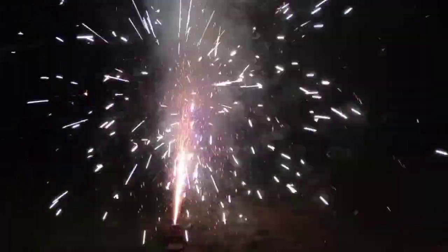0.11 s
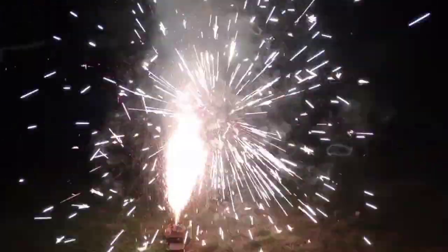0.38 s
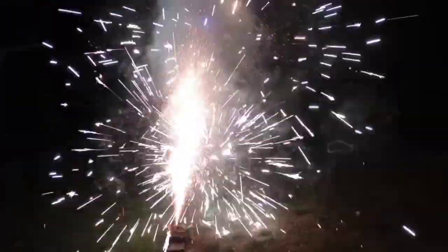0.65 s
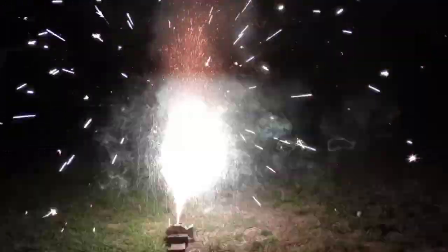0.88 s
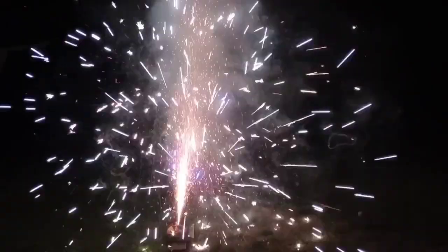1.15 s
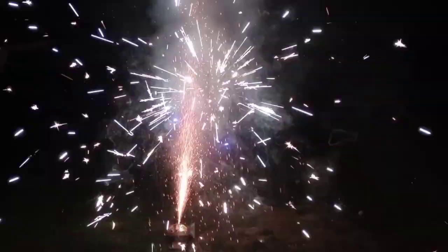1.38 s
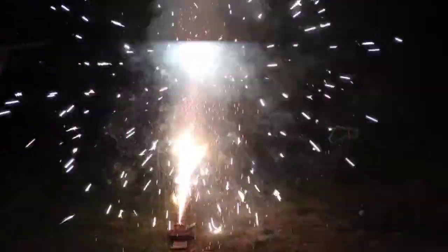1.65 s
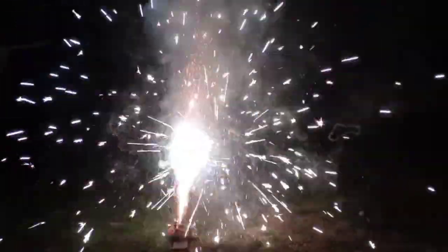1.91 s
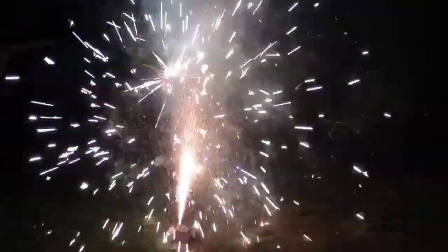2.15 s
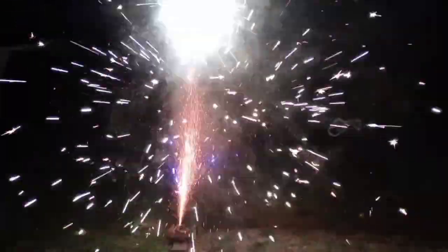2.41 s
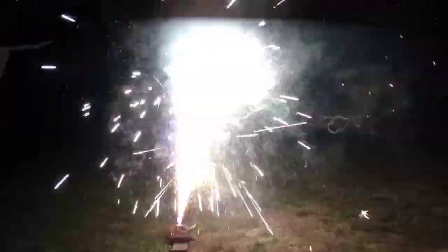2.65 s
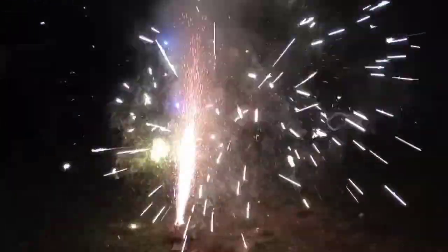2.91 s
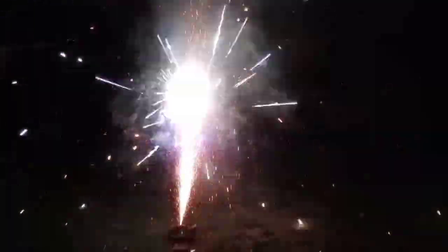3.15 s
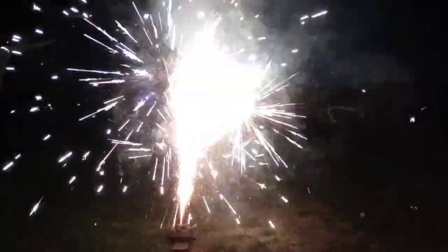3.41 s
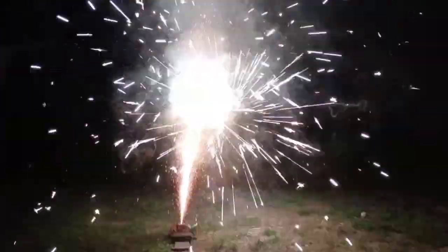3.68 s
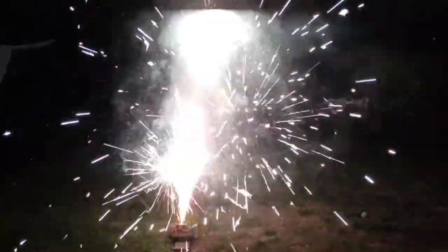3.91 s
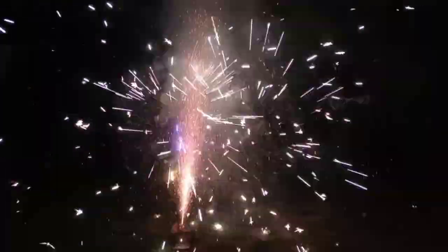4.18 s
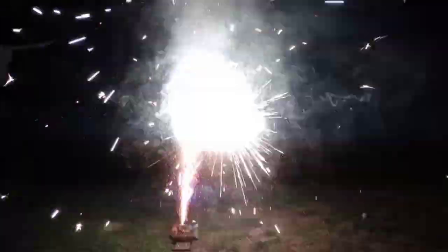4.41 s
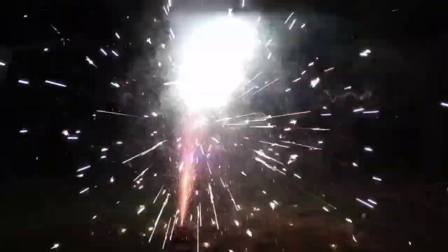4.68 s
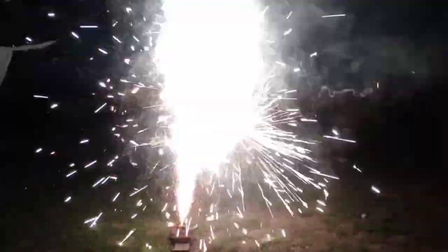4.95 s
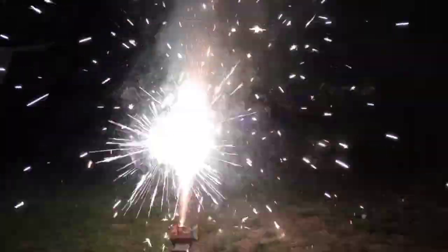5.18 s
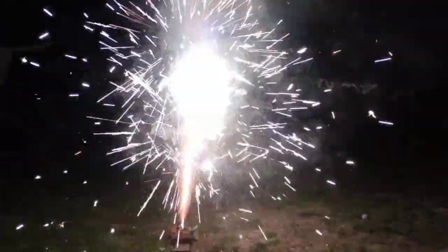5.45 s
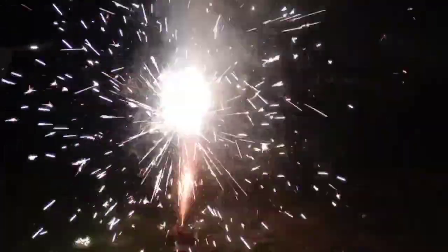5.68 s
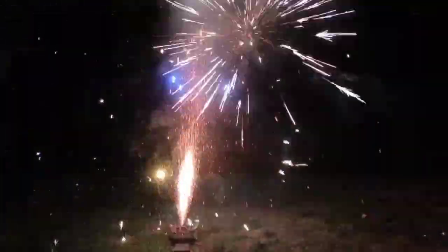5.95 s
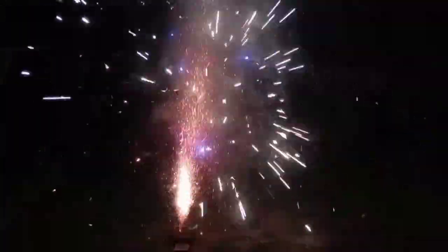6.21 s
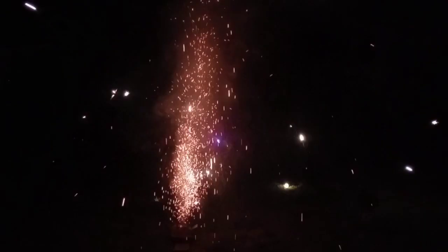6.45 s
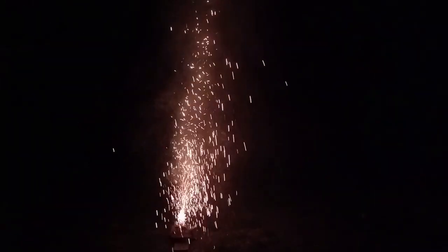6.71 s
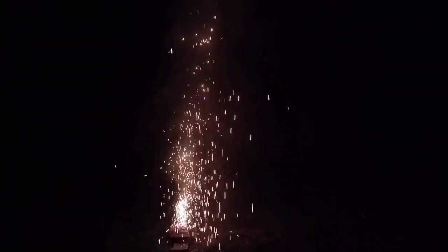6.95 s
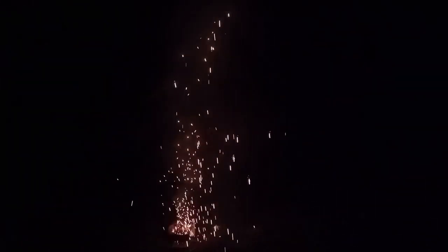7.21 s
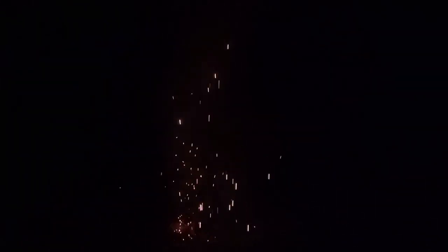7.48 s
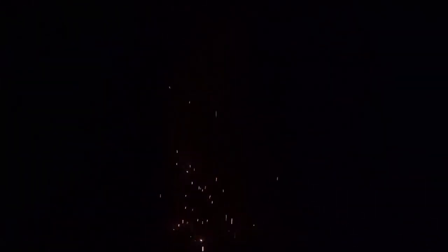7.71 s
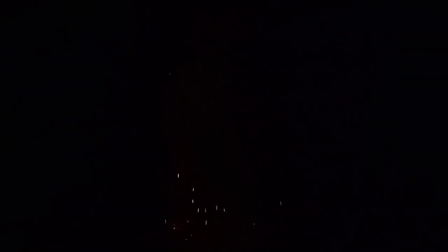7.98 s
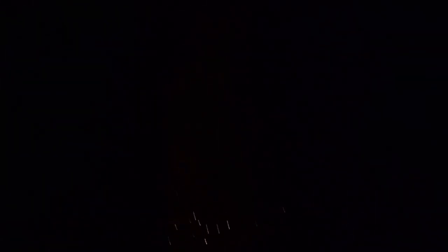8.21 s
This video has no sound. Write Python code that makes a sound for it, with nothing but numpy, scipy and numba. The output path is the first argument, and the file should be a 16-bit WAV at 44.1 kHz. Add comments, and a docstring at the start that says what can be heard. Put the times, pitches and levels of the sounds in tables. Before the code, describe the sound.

A firework fountain crackles outdoors in a loud, dense, irregular barrage of sharp cracks and thumps, then abruptly dies to faint hiss and insects.

```python
"""Firework fountain on a night lawn

A fountain crackles a few metres from two unlike microphones. Each star burst is a crack and its bounce off
the lawn, built from impulses, with a sizzle of noise; the microphones overload at it with a low decaying thump.
Small sparks pop between, and a wall and the yard echo the sharp sounds. The jet, coloured noise, hisses and
dies, leaving night air and insect bands of noise, a frog's trill of gliding pulses, a few dull ticks and a
thin insect note.
"""
import sys
import numpy as np
from scipy import signal
from scipy.fft import rfft, irfft
from scipy.io import wavfile
from scipy.ndimage import uniform_filter1d, minimum_filter1d
from numba import njit

SR = 44100
rng = np.random.default_rng(int(sys.argv[2]) if len(sys.argv) > 2 else 0)


def undo_db(level):
    """Turn decibels back into plain size, where 20 dB means ten times bigger."""
    steps = np.asarray(level, float) / 20
    return 10 ** steps


def persist_wave(psi):
    """Save psi, clipped to +-1, as 16-bit WAV."""
    counts = np.round(np.clip(psi, -1, 1) * 32767).astype(np.int16)
    wavfile.write(sys.argv[1], SR, np.atleast_2d(counts).T)


N = 368232
T = np.arange(N) / SR  # s

# how hard the fountain burns: t/s, level/dB against full burn
BURN = [(0, 0), (6.0, -1.5), (6.4, -5.5), (6.52, -15.5), (6.75, -24.5), (7.2, -35.5), (8.35, -51.5)]
# tone of the gas jet: f/Hz, level/dB
JET_COLOUR = [(150, -28.5), (500, -11), (1000, -12.5), (2000, -11.5), (4500, -9.5), (9000, -8.5),
              (16000, -9)]
# tone of the night air: f/Hz, level/dB
AIR_COLOUR = [(40, -14), (90, 0), (350, -12.5), (1000, -7), (6500, -13), (7500, -61), (16000, 2)]
# moments when the air and jet hiss drop: from t/s, to t/s, level/dB on the left
HISS_DIPS = [(6.756, 6.98, -11.5), (7.712, 7.895, -12), (8.173, 8.4, -15)]
# insect bands: centre f/Hz, width f/Hz, level/dB before flutter and panning
INSECTS = [(2450, 990, -80.5), (4420, 1200, -88), (6180, 400, -86)]
# star bursts: t/s, relative level/dB of the microphone overload thump
STAR_BURSTS = [(0.0087, -45), (0.0313, -13), (0.0754, -31), (0.102, -35.5), (0.1204, -20.5), (0.1552, -8),
               (0.166, -26), (0.1978, -37), (0.2776, -36.5), (0.3017, -23.5), (0.3232, -19), (0.3693, -18),
               (0.3936, -20), (0.4024, -18.5), (0.4299, -9), (0.445, -9.5), (0.464, -12.5), (0.4825, -11.5),
               (0.5705, -34.5), (0.6532, -36.5), (0.6831, -12), (0.6982, -9), (0.7134, -21),
               (0.7503, -11.5), (0.8007, -17.5), (0.8261, -11.5), (0.8444, -12), (0.9216, -16),
               (0.9596, -29), (1.017, -14), (1.0967, -6.5), (1.1839, -25.5), (1.1993, -8.5), (1.2101, -15),
               (1.225, -11), (1.2537, -10.5), (1.3724, -10.5), (1.3943, -26), (1.4038, -2.5),
               (1.4292, -44.5), (1.471, -12.5), (1.4886, -10.5), (1.5482, -20), (1.5826, -53.5),
               (1.6159, -10.5), (1.635, -13.5), (1.657, -28), (1.6687, -11), (1.689, -14), (1.7562, -9),
               (1.8022, -7), (1.839, -15), (1.8757, -12.5), (1.9078, -8), (1.9453, -7.5), (1.9652, -27),
               (2.0005, -20.5), (2.0248, -11.5), (2.0865, -11), (2.1047, -20), (2.1361, -18.5),
               (2.1587, -21.5), (2.1934, -21.5), (2.2133, -12.5), (2.2455, -14.5), (2.2834, -38.5),
               (2.2979, -22.5), (2.318, -13), (2.3396, -14), (2.3618, -18), (2.4145, -15), (2.437, -17),
               (2.4628, -9), (2.4796, -8.5), (2.518, -13), (2.5469, -3.5), (2.6902, -10), (2.766, -12),
               (2.7908, -8.5), (2.8425, -11.5), (2.875, -13), (2.9616, -8.5), (2.994, -17.5),
               (3.0467, -44.5), (3.0684, -11), (3.0834, -18.5), (3.1095, -18), (3.2305, -46.5),
               (3.268, -59.5), (3.3034, -14), (3.3257, -12.5), (3.4155, -12.5), (3.4455, -14.5),
               (3.5144, -5), (3.5301, -9), (3.5738, -12), (3.5928, -23.5), (3.6083, -24.5), (3.6393, -8),
               (3.663, -10.5), (3.7023, -16.5), (3.7172, -16), (3.7546, -12.5), (3.7956, -9),
               (3.8261, -7.5), (3.8484, -25.5), (3.8614, -19), (3.883, -7), (3.9058, -11), (3.9334, -14),
               (3.9499, -14), (3.9736, -15.5), (3.9932, -10.5), (4.0271, -21), (4.0465, -7.5),
               (4.0962, -14), (4.111, -16.5), (4.17, -21.5), (4.1888, -24.5), (4.2487, -26.5),
               (4.2619, -16.5), (4.3618, -30), (4.3871, -12), (4.4131, -45.5), (4.4537, -24.5),
               (4.4765, -50), (4.5141, -11), (4.5339, -13), (4.546, -25.5), (4.6039, -19), (4.6227, -14.5),
               (4.6621, -27), (4.69, -15.5), (4.701, -29.5), (4.7272, -17.5), (4.769, -13.5),
               (4.7888, -15.5), (4.8748, -8.5), (4.8955, -25.5), (4.908, -15), (4.9268, -20.5),
               (4.9454, -11.5), (4.9679, -10.5), (5.0045, -11), (5.03, -15), (5.0488, -10), (5.1101, -34.5),
               (5.1538, -35.5), (5.1796, -20), (5.1886, -19.5), (5.1983, -15), (5.2069, -14), (5.2204, -13),
               (5.2955, -18.5), (5.3084, -7), (5.3472, -25.5), (5.367, -11.5), (5.383, -17), (5.4163, -31),
               (5.4373, -18.5), (5.4582, -17), (5.4914, -15), (5.5196, -14.5), (5.5326, -14.5),
               (5.542, -15.5), (5.5606, -24.5), (5.577, -13), (5.5935, -11.5), (5.6394, -15), (5.661, -11),
               (5.6678, -19.5), (5.7266, -35), (5.7483, -30), (5.7637, -19.5), (5.7866, -27), (5.7989, -9),
               (5.8354, -24.5), (5.8461, -19.5), (5.907, -5.5), (5.9405, -24), (6.0431, -20.5),
               (6.0854, -18), (6.101, -13.5), (6.1177, -19.5), (6.2045, -25.5), (6.2202, -28),
               (6.2726, -58), (6.2934, -15), (6.381, -41), (6.7638, -66.5)]
# course of the frog's trill: t/s, pulse rate f/Hz, level/dB
FROG_TRILL = [(7.45, 54.2, -63), (7.6, 53.6, -60.5), (8.0, 51.6, -59.5)]
# partials of the frog's voice: multiple of the main pitch, level/dB, left minus right level/dB
FROG_PARTIALS = [(0.548, -10, 3), (1, -3, -11.5), (1.56, -15.5, -5)]
# ticks, before their dull colour: t/s, level/dB, left minus right level/dB
TICKS = [(7.5803, -30.5, -12), (8.167, -57, 0), (8.293, -39, -9), (8.308, -47.5, -24)]
# left microphone, plain: f/Hz, level/dB
LEFT_MIC = [(25, -36), (60, 10.5), (120, 6.5), (1500, 7), (3700, 10), (6000, 14.5), (7500, 9.5),
            (12500, 4.5), (16000, -4.5)]
# right microphone, behind a thin, ringing port: f/Hz, level/dB
RIGHT_MIC = [(25, -20), (120, -15), (600, 6.5), (1600, 7), (2150, 14.5), (2700, 12), (3750, 22.5),
             (4500, 20), (5700, 24.5), (7000, 12.5), (9000, -6.5), (16000, -13.5)]

JET_DB, AIR_DB = -37, -62.5  # rms of each hiss before its dips; the jet at full burn
CRACKLE_DB, CRACKLE_ENDS_S = -31.5, 6.3  # faintest small spark
CRACK_DB, CRACK_SCATTER_DB = -8, 1.5  # relative crack level at full burn, and its spread
CRACK_PER_THUMP = 0.1  # dB of crack per dB of thump: bursts with faint thumps crack a little more softly
WHINE_FROM_S, WHINE_TO_S, WHINE_HZ, WHINE_DB = 8.08, 8.29, 2580, -80  # level before panning
INSECT_PAN = undo_db([[-4], [4]])  # gains: insects sit to the right
DUCK_AHEAD_S, DUCK_HOLD_S, DUCK_RELEASE_S, DUCK_MOST_DB = 0.019, 0.027, 0.033, 13.5


def convolve(x, shape):
    """Every sample of x starts a copy of shape."""
    return signal.oaconvolve(np.atleast_2d(x), np.atleast_2d(shape), axes=-1)[:, :N]


def colour(x, points):
    """Causal filter through (Hz, dB) points, from the cepstrum of the log gain."""
    hz, db = np.transpose(points)
    size = 2 ** 13
    bins_hz = np.arange(size // 2 + 1) * SR / size
    gain_db = np.interp(np.log(bins_hz + 1), np.log(hz), db)
    cepstrum = irfft(np.log(undo_db(gain_db)))
    # fold the cepstrum onto positive time: minimum phase
    cepstrum[1:size // 2] *= 2
    cepstrum[size // 2 + 1:] = 0
    response = irfft(np.exp(rfft(cepstrum)))[:size // 2]
    return convolve(x, response)


def band(x, hz, width_hz):
    """Band-pass around hz."""
    edges_hz = [hz - width_hz / 2, hz + width_hz / 2]
    return signal.sosfilt(signal.butter(2, edges_hz, "band", fs=SR, output="sos"), x)


def level(x, db):
    """Scale to an rms level."""
    return x * undo_db(db) / np.sqrt(np.mean(x ** 2))


def spikes(s, size):
    """A one-sample impulse at each time."""
    at = np.minimum(np.asarray(s) * SR, N - 1).astype(int)
    return np.bincount(at, size, N)


def fade(t60_s, length_s):
    """Exponential decay, 60 dB down after t60_s."""
    return 1000. ** (-np.arange(int(length_s * SR)) / SR / t60_s)


def walk(rate):
    """Random levels held 1 / rate s and slewed; spread near 1."""
    hold = int(SR / rate)
    steps = np.repeat(rng.standard_normal(N // hold + 1), hold)
    return uniform_filter1d(steps, hold)[:N]


def burn_db(s):
    """Strength of the burn at these times: it sinks as the fountain dies."""
    return np.interp(s, *np.transpose(BURN))


def dips():
    """Gain of the hiss, which drops out for moments, deeper on the left."""
    steps_db = sum(db * ((T > start) & (T < end)) for start, end, db in HISS_DIPS)
    db = uniform_filter1d(steps_db, size=400)
    return undo_db(db * np.array([[1], [.7]]))


def jet():
    """Gas rushing out: coloured noise, unrelated on the two sides, sinking with the burn."""
    hiss = colour(rng.standard_normal((2, N)), JET_COLOUR)
    return level(hiss, JET_DB) * dips() * undo_db(burn_db(T))


def night_air():
    """Air hiss: coloured noise on each side plus a bass rumble shared by both."""
    hiss = colour(rng.standard_normal((2, N)), AIR_COLOUR)
    rumble = band(rng.standard_normal(N), 150, 270)
    return level(hiss + undo_db(-1.5) * rumble, AIR_DB) * dips()


def insects():
    """Lasting bands of noise to the right, each fluttering in level."""
    chorus = 0
    for hz, width_hz, db in INSECTS:
        chirr = band(rng.standard_normal((2, N)), hz, width_hz)
        chorus = chorus + level(chirr, db) * undo_db(2 * walk(22))
    return chorus * INSECT_PAN


def crackle(rate=260):
    """Many small sparks pop at random, rate per s; a few are much larger than the rest."""
    chance = rng.random((int(rate * T[-1]), 3))
    above_faintest_db = -2.5 * np.log(1 - chance[:, 1])
    sign = np.sign(chance[:, 2] - .5)
    pops = spikes(chance[:, 0] * T[-1], undo_db(above_faintest_db) * sign)
    return undo_db(CRACKLE_DB) * (T < CRACKLE_ENDS_S) * pops


def bursts():
    """Shock front, ground bounce and spitting fragments; beside them a low microphone overload thump."""
    s, thump_db = np.transpose(STAR_BURSTS)
    chance, draw = rng.standard_normal((len(s), 5)), rng.random((len(s), 5))
    crack_db = CRACK_DB + CRACK_SCATTER_DB * chance[:, 4] + CRACK_PER_THUMP * thump_db + burn_db(s)
    sign = np.sign(chance[:, 0])
    # the lawn bounce follows 1.7 to 3.7 ms later, at random
    bounce_s = s + 0.0017 + 0.002 * draw[:, 0]
    bounce_db = crack_db - 4.0 + 2.9 * chance[:, 1]
    fronts = spikes(s, sign * undo_db(crack_db)) - spikes(bounce_s, sign * undo_db(bounce_db))
    # stars split: a second piece cracks 1.1 to 5.1 ms later
    piece_s = s + 0.0011 + .004 * draw[:, 3]
    fronts = fronts + spikes(piece_s, sign * undo_db(crack_db - 5.6 * draw[:, 4]))

    spit = rng.standard_normal((2, N)) * undo_db(7.95 * walk(3000))
    sizzle = spit * convolve(np.abs(fronts), fade(0.02, .06))

    # each microphone overloads at a burst and thumps with its own random sign
    sides = np.array([sign, np.sign(chance[:, 2])])
    bounce_gain = undo_db(-5.0 + 4.46 * chance[:, 3])
    thumps = 0
    for share, hz, t60_s in ((draw[:, 1], 130, .022), (1 - draw[:, 1], 260, .01), (draw[:, 2], 650, .004)):
        size = undo_db(thump_db) * share * sides
        blows = [spikes(s, a) - spikes(bounce_s, a * bounce_gain) for a in size]
        body = fade(t60_s, .06) * np.cos(2 * np.pi * hz * T[:int(.06 * SR)])
        thumps = thumps + convolve(blows, body)

    # beside the sharp edge each front has a blunter part of its own size, so colours differ
    blunt = uniform_filter1d(fronts + spikes(s, sign * undo_db(crack_db) * chance[:, 3]), size=3)
    cracks = undo_db(3.5) * fronts + undo_db(7.5) * blunt + undo_db(-9.5) * sizzle
    return colour(cracks, [(200, -1.5), (1500, -3.5)]), undo_db(7) * thumps


def yard(sharp):
    """A wall on the left sends a clean copy after 22.6 ms; hedges further off return a long wash."""
    wall = np.roll(sharp, int(.0226 * SR), axis=1) * undo_db([[-7], [-13]])
    t = T[:int(.7 * SR)]
    wash = fade(0.6, .7) * (1 - np.exp(-t / 0.0037)) * rng.standard_normal((2, len(t)))
    wash = wash / np.sqrt(np.mean(wash ** 2) * len(t))  # unit energy
    # foliage scatters the middle treble back; the bass passes through it and hardly returns
    thin = colour(sharp, [(400, -28), (1000, -12.5), (3000, -9.5), (6000, -16.5), (12000, -15)])
    return wall + convolve(thin, wash)


def fountain():
    """Jet, small crackles and star bursts with their overload thumps; only the sharp sounds raise echoes."""
    cracks, thumps = bursts()
    sharp = cracks + crackle()
    return jet() + sharp + thumps + yard(sharp)


def frog():
    """A trill of short pulses, each gliding up in pitch."""
    s, rate_hz, db = np.transpose(FROG_TRILL)
    on = (T > s[0]) & (T < s[-1])
    # place within each pulse, in pulse periods from its peak
    phase = np.cumsum(on * np.interp(T, s, rate_hz)) / SR % 1 - .45
    angle = 2 * np.pi * np.cumsum(2450 * (1 + 0.28 * phase)) / SR
    voice = 0
    for multiple, partial_db, pan_db in FROG_PARTIALS:
        sides = undo_db([[partial_db + pan_db / 2], [partial_db - pan_db / 2]])
        voice = voice + sides * np.sin(multiple * angle)
    pulses = np.exp(-(phase / .16) ** 2)
    return voice * on * pulses * undo_db(np.interp(T, s, db))


def ticks():
    """Short dull ticks close by: impulses with the treble filtered down."""
    s, db, pan_db = np.transpose(TICKS)
    clicks = np.array([spikes(s, undo_db(db + side * pan_db / 2)) for side in (1, -1)])
    return colour(clicks, [(150, -2), (1200, 6.5), (4000, -7), (9000, -23)])


def whine():
    """A thin insect note near the end: a narrow band of noise switched on and off."""
    note = level(band(rng.standard_normal(N), WHINE_HZ, 120), WHINE_DB)
    return note * (T > WHINE_FROM_S) * (T < WHINE_TO_S) * INSECT_PAN


def scene():
    """Everything at the two microphones, ahead of their colours."""
    return fountain() + night_air() + insects() + frog() + ticks() + whine()


@njit
def follow(x, release):
    """Peak follower: jumps up at once, sinks slowly."""
    out, top = np.empty(len(x)), 1e-6
    for i in range(len(x)):
        top = max(x[i], top * release)
        out[i] = top
    return out


def duck(mics):
    """Look-ahead gain control: drops ahead of a peak, holds, then recovers, so echoes swell in the pauses."""
    ahead, hold = int(DUCK_AHEAD_S * SR), int(DUCK_HOLD_S * SR)
    release = np.exp(-1 / (DUCK_RELEASE_S * SR))
    peak_db = 20 * np.log10(np.abs(mics).max(axis=0) + 1e-9)
    # 1.42 dB of cut for each dB above -17 dB
    cut_db = np.clip(1.42 * (peak_db + 17), 0, DUCK_MOST_DB)
    # running maximum that reaches ahead of and behind each peak
    held_db = -minimum_filter1d(-np.roll(cut_db, (hold - ahead) // 2), hold + ahead)
    smooth_db = uniform_filter1d(follow(held_db, release), ahead)
    return mics * undo_db(8.0 - smooth_db)


def roll_off(x):
    """The treble ends steeply here."""
    return signal.sosfilt(signal.butter(12, 16980, fs=SR, output="sos"), x)


def record(dry):
    """Two coloured microphones, the right 4 samples late, then ducking around pops and soft clipping."""
    left = colour(dry[0], LEFT_MIC)
    right = np.roll(colour(dry[1], RIGHT_MIC), 4)
    ducked = duck(np.vstack([left, right]))
    mix = 0.82 * np.tanh(ducked / 0.91)
    return roll_off(mix)


dry = scene()
out = record(dry)
persist_wave(out)
```